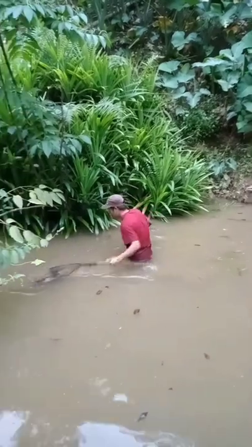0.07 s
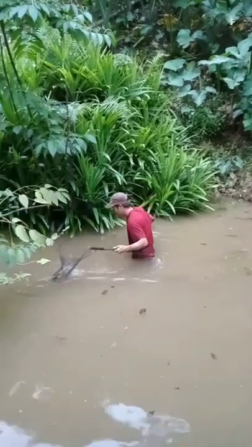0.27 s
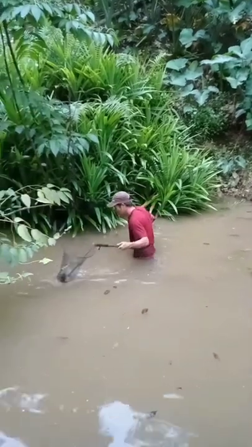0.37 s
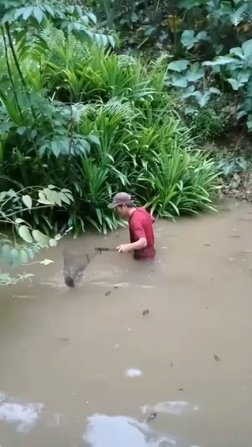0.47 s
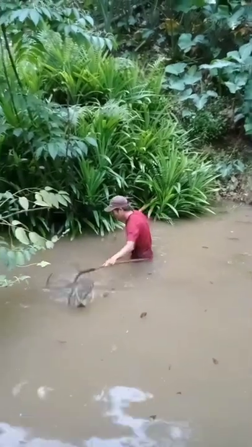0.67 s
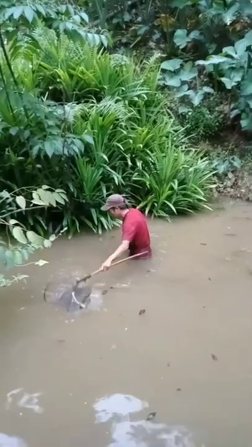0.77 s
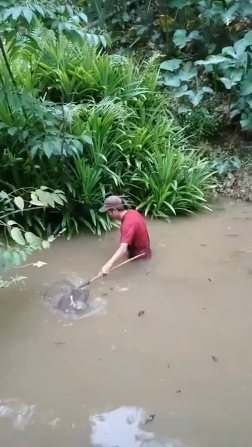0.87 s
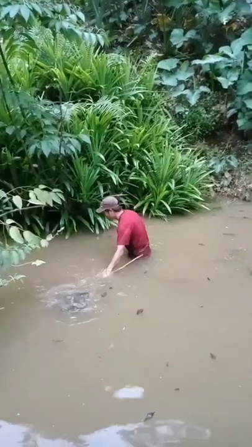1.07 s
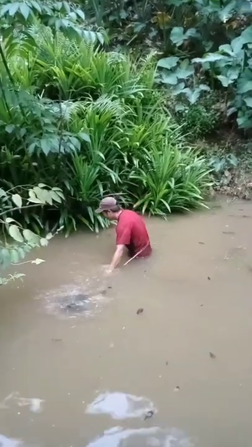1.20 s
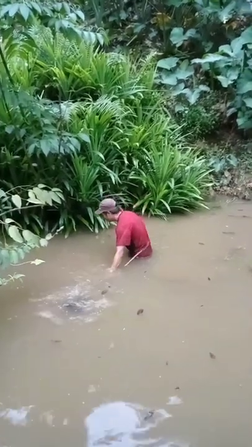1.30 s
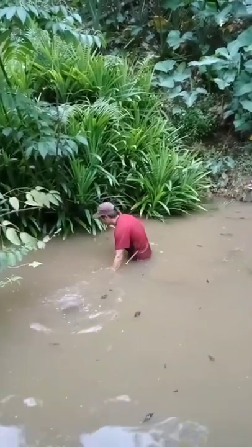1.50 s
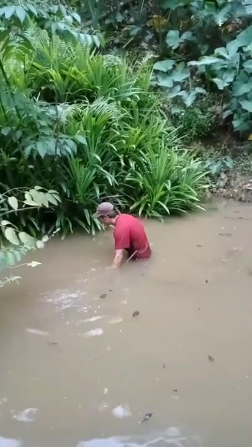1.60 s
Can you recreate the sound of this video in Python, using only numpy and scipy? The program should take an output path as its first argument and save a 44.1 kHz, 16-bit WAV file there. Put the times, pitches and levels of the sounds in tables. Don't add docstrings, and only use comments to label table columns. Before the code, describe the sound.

A hand net stirs and plunges into a pond: light gulps and drips first, then a burst of splashes around one second, fading to small blips; faint insects and hiss outdoors, water heard clear and close.

```python
import sys
import numpy as np
from scipy import signal
from scipy.fft import rfft, irfft, next_fast_len
from scipy.io import wavfile
from scipy.ndimage import map_coordinates

SR = 44100
rng = np.random.default_rng(int(sys.argv[2]) if len(sys.argv) > 2 else 0)


def dump(signal):
    limited = np.clip(np.atleast_2d(signal).T, -1, 1)
    pcm = np.round(limited * 32767).astype(np.int16)
    wavfile.write(sys.argv[1], SR, pcm)


def invert_db(x):
    u = np.asarray(x, float) / 20
    return 10 ** u


N = 72765

# frequency in Hz, density in dB per Hz.
RUMBLE_COLOUR = [(20, -51), (60, -4), (150, 1.5), (300, -5.5), (750, -6), (1050, -7), (2400, -15),
                 (3000, -16)]
# frequency in Hz, density in dB per Hz.
HISS_COLOUR = [(2000, -46), (2700, -1.5), (5300, -4.5), (6100, -10), (8000, -22), (9500, -4.5),
               (12700, -12.5), (15500, -3.5)]
# centre in Hz, width in Hz, level in dB, pulses per second, pulse depth 0-1.
INSECTS = [
    (7067, 180, -71, 69, 0),
    (5164, 380, -63.5, 54, 0.18),
    (4534, 340, -65.5, 19, 0.26),
    (3150, 270, -73.5, 29, 1),
    (9170, 330, -70.5, 110, 0.3),
]
# time in seconds, gain in dB.
CHOIR_SWELL = [
    (0, -1.5),
    (.3, -1),
    (.7, 0),
    (1.1, 3),
    (1.3, 3),
    (1.41, 1),
    (1.45, -7.5),
    (1.55, 0),
    (1.65, -4),
]
# start in seconds, length in seconds, pitch in Hz, level in dB.
FROGS = [
    (0.26, 0.18, 1010, -66),
    (0.33, 0.354, 300, -67),
    (0.26, 0.17, 139.4, -66.5),
    (0.55, 0.085, 150, -67.5),
]
# time in seconds, strength in dB.
STIRRING = [(0, -65), (.2, -63.5), (.25, -56.5), (.36, -57.5), (.59, -58.5), (0.619, -52.5), (.69, -60.5),
            (.72, -55), (.85, -55.5), (0.913, -54), (0.937, -45.5), (0.978, -46), (1.008, -55),
            (1.06, -55.5), (1.09, -52.5), (1.17, -57.5), (1.225, -54.5), (1.281, -69.5)]
# time in seconds, mist gained in dB (coarse fizz loses half).
FINENESS = [
    (0, 2.5),
    (.3, -1),
    (.6, 0),
    (.82, 0.5),
    (.87, 1),
    (.96, 3),
    (1.03, -0.5),
    (1.14, 3.5),
    (1.18, 1),
]
# frequency in Hz, density in dB per Hz.
CHURN_COLOUR = [(120, -16), (300, -9.5), (700, -0.5), (1050, -4), (1400, 4), (2200, 11.5), (2650, 9),
                (3200, -70)]
# frequency in Hz, density in dB per Hz.
FIZZ_COLOUR = [(2200, -48), (2800, -6), (3300, -2.5), (5300, -5.5), (6200, -18), (9500, -5), (12300, -16.5),
               (15500, -16.5)]
# time in seconds, peak in dB.
SPRAY = [(0.234, -45), (0.5262, -56), (0.606, -50), (0.7222, -43.5), (0.82, -44), (0.8723, -42),
         (0.888, -41), (0.9196, -48), (0.9414, -35.5), (0.978, -46), (1.0306, -44), (1.07, -44.5),
         (1.0992, -45), (1.1308, -41), (1.2045, -35.5), (1.2095, -35), (1.2162, -41), (1.223, -40),
         (1.231, -35), (1.5783, -47.5)]
# frequency in Hz, density in dB per Hz.
TICK_COLOUR = [(2500, -42), (6000, -24), (9500, 7.5), (12500, -17), (15500, -7.5)]
# start in seconds, peak in dB, pitch in Hz, life in cycles.
DROPS = [(.065, -40.5, 3110, 15), (0.114, -38, 3240, 10), (.215, -36.5, 2040, 9.7), (.261, -39, 1720, 11),
         (.47, -40, 3150, 39), (.4965, -34.5, 2100, 8.8), (.611, -42, 2110, 11), (0.652, -39, 2090, 16),
         (.709, -41, 1810, 28), (.722, -37, 2720, 44), (.737, -35, 2195, 16), (.752, -35, 2130, 16),
         (0.758, -28.5, 2410, 11), (.4705, -40, 4100, 6), (.792, -41, 2210, 18), (0.832, -39, 2330, 18),
         (.875, -36.5, 2380, 21), (.898, -36, 2440, 18), (.921, -32.5, 2100, 11), (.93, -33, 2030, 17.5),
         (0.942, -34, 3350, 39), (.948, -29.5, 2390, 23), (.957, -33, 2120, 21), (0.962, -26.5, 2860, 11),
         (.975, -31, 2330, 17.5), (0.98, -24.5, 4040, 13.3), (1.031, -39, 3420, 14),
         (1.079, -22.5, 3390, 8.8), (1.0805, -24.5, 3180, 16), (1.079, -35, 2140, 13),
         (1.084, -28, 2100, 7.8), (1.081, -33, 4250, 14), (1.07, -34, 4300, 14), (1.087, -44, 3380, 9),
         (1.093, -41, 2300, 14), (1.097, -41, 2170, 10), (.525, -36, 2100, 10), (0.56, -37, 1790, 8.5),
         (0.578, -40, 2130, 16), (.944, -38, 10100, 25), (.953, -37, 8900, 24), (.963, -31, 9700, 22),
         (.968, -34, 8360, 22), (.9745, -30.5, 9600, 25), (1.097, -36.5, 3150, 20),
         (1.197, -43.5, 1810, 19), (1.439, -48.5, 2980, 22), (1.554, -51, 3040, 20), (1.352, -55, 3430, 20)]
# start in seconds, peak in dB, pitch in Hz,
# life in seconds, ratio of end pitch to start pitch.
AIR_POCKETS = [(0.24, -38.5, 264, 0.055, 3.2), (.235, -45.5, 636, 0.012, 1),
               (.543, -37, 734, 0.018, 0.84), (.617, -34.5, 716, 0.0069, 1.15),
               (.626, -40.5, 731, 0.013, 1.1), (.666, -41, 580, 0.024, 0.97),
               (.702, -45, 589, 0.032, 1.7), (.746, -50, 647, 0.028, 1.05), (.764, -52, 277, 0.019, 0.88),
               (.877, -49.5, 727, 0.028, 1.3), (.922, -35.5, 729, 0.019, 0.92),
               (.936, -40.5, 433, 0.027, 0.82), (.969, -31.5, 640, 0.014, 0.85),
               (.992, -37.5, 603, 0.014, 1.05), (1.009, -43.5, 641, 0.024, 2.1),
               (1.1, -41, 402.3, 0.056, 1.02), (1.099, -43, 713, 0.021, 0.97),
               (1.138, -38.5, 570, 0.0076, 1.5), (1.233, -41.5, 355, 0.044, 2.15),
               (1.253, -37, 585, 0.018, 1.08), (1.265, -37, 691, 0.017, 1.12),
               (1.253, -38.5, 1437, 0.021, 1.25), (.497, -32, 1370, 0.013, 0.94),
               (.643, -40, 1470, 0.0091, 0.86),
               (.005, -59.5, 417, .03, 0.97), (.075, -57, 432, 0.026, .9), (.11, -67, 614, 0.047, 1.8),
                 (.268, -52, 290, 0.041, 1.2), (.368, -60, 527, .025, 0.85), (.435, -77, 520, 0.023, 0.81),
                 (.513, -44, 1360, 0.012, 1.1), (.543, -45.5, 1297, 0.024, 1.16),
                 (.572, -54, 766, 0.024, 1.06), (.606, -55, 515, 0.014, 1.1),
                 (.633, -48.5, 870, 0.013, 0.91), (.643, -44.5, 625, 0.014, 0.79),
                 (.654, -38, 716, 0.0088, 1.5), (.684, -42, 627, 0.014, 1.4),
                 (.703, -46.5, 823, .022, 1.15), (.705, -46, 412, .012, 0.63), (.76, -51, 710, .014, 1.25),
                 (.862, -42, 774, 0.0067, 0.85), (.888, -54, 790, .012, 1), (.917, -46, 330, 0.0092, 0.9),
                 (.946, -39, 430, 0.019, 0.85), (.955, -47.5, 625, 0.0052, 1.5),
                 (1.0, -52.5, 325, 0.044, 0.86), (1.001, -37, 605, 0.013, 1.15),
                 (1.083, -42.5, 1010, .008, 0.79), (1.115, -63, 594, 0.011, 1.1),
                 (1.15, -49.5, 480, 0.024, 1.03), (1.185, -54, 279, 0.034, 1),
                 (1.215, -42.5, 437, .015, 0.77), (1.295, -58, 747, 0.029, 1.16),
                 (1.34, -56, 560, 0.033, 0.89), (1.4, -62, 611, 0.038, 1.7),
                 (1.437, -58.5, 896, 0.016, 1.1), (1.46, -50, 895, 0.0047, 1.1),
                 (1.49, -63.5, 752, 0.043, 1.2), (1.517, -61, 1476, 0.014, 1),
                 (1.568, -56.5, 1280, 0.021, 1), (1.597, -55.5, 1510, 0.0091, 1)]


def unit(x):
    return x / np.sqrt(np.mean(x ** 2) + 1e-20)


def noise():
    return rng.standard_normal(N)


def wobble(rate):
    knots = rng.standard_normal(int(N * rate / SR) + 4)
    return map_coordinates(knots, [np.arange(N) * rate / SR])


def curve(points):
    return np.interp(np.arange(N) / SR, *np.transpose(points))


def filtered(x, response):
    size = next_fast_len(N + SR // 2)
    hz = np.fft.rfftfreq(size, 1 / SR)
    return irfft(rfft(x, size) * response(hz), size)[:N]


def coloured(x, colour):
    f, db = np.transpose(colour)
    return unit(filtered(x, lambda hz: invert_db(np.interp(np.log(hz + 1), np.log(f + 1), db))))


def bubbles(start, db, hz, life, rise, attack_s, fade_db, size):
    t = np.arange(size) / SR
    age = t / life[:, None]
    glide = 1 + (rise[:, None] - 1) * np.minimum(age, 1.3) ** 2 / 3
    ring = np.sin(2 * np.pi * hz[:, None] * t * glide)
    envelope = invert_db(db[:, None] - fade_db * age) * (1 - np.exp(-t / attack_s))
    envelope = envelope * np.clip(3 - 2 * age, 0, 1)
    at = np.round(start * SR).astype(int)[:, None] + np.arange(size)
    return np.bincount(at.ravel(), (envelope * ring).ravel(), N + size)[:N]


def swarm(lo_hz, hi_hz, cycles, spread_db, count, size):
    u = rng.random((count, 4))
    start = u[:, 0] * (N - 1) / SR
    db = spread_db * u[:, 2] ** 2
    hz = lo_hz * (hi_hz / lo_hz) ** u[:, 1]
    life = cycles * (0.5 + u[:, 3]) / hz
    return unit(bubbles(start, db, hz, life, np.full(count, 1.152), 0.000072, 16, size))


def far():
    rumble = invert_db(-68.5 + 0.73 * wobble(8.06)) * coloured(noise(), RUMBLE_COLOUR)
    hiss = invert_db(-66) * coloured(noise(), HISS_COLOUR)
    return rumble + hiss


def insects():
    out = np.zeros(N)
    choir_db = curve(CHOIR_SWELL)
    for hz, width, db, rate, depth in INSECTS:
        rasp = unit(filtered(noise(), lambda f: np.exp(-((f - hz) / width) ** 4)))
        beat = np.cos(2 * np.pi * np.cumsum(rate * (1 + 0.054 * wobble(8.6))) / SR)
        in_choir = 4000 < hz < 6000
        swell_db = 0.2 * wobble(6.03) + choir_db * in_choir
        out += invert_db(db + swell_db) * (1 + np.clip(depth, 0, 1) * beat) * rasp
    return out


def frogs():
    out = np.zeros(N)
    t = np.arange(N) / SR
    for start, length, hz, db in FROGS:
        swell = np.sqrt(np.abs(np.sin(np.pi * np.clip((t - start) / length, 0, 1))))
        tone = np.sin(2 * np.pi * hz * np.cumsum(1 + 0.0118 * wobble(15)) / SR)
        out += invert_db(db + 2.0 * wobble(40.3)) * swell * tone
    return out


def bank_echo(x):
    delay_s, t60_s = 0.012, 0.1
    t = np.arange(SR // 4) / SR
    tail = rng.standard_normal(len(t)) * invert_db(-60 * t / t60_s) * (t > delay_s)
    return signal.fftconvolve(x, tail / np.linalg.norm(tail))[:N]


def churn():
    stir_db = curve(STIRRING)
    stir_db = stir_db - stir_db.mean() + 1.3 * wobble(40)

    bed = coloured(noise(), [(200, 0), (3000, -12)])
    crowd = swarm(251.0, 3033, cycles=9.3, spread_db=8, count=1800, size=1600)
    body = coloured(crowd + 0.89 * bed, CHURN_COLOUR)

    crowd = swarm(2390, 14540, cycles=7.6, spread_db=15.5, count=8000, size=200)
    fizz = coloured(crowd + 0.95 * noise(), FIZZ_COLOUR)
    mist = filtered(fizz, lambda hz: hz > 7620)
    coarse = fizz - mist
    fine_db = curve(FINENESS)
    clumps = invert_db(2.5 * wobble(130))
    fizz = clumps * (invert_db(fine_db) * mist + invert_db(-fine_db / 2) * coarse)

    return invert_db(-61.5 + 1.133 * stir_db) * body + invert_db(-60.5 + stir_db) * fizz


def spray():
    size, decay_s, trim_db = 400, 0.0018, -6
    gate = np.zeros(N + size)
    t = np.arange(size) / SR
    for start, db in SPRAY:
        gate[round(start * SR):][:size] += invert_db(db + trim_db) * np.exp(-t / decay_s)
    return gate[:N] * coloured(noise(), TICK_COLOUR)


def drops():
    start, db, hz, cycles = np.transpose(DROPS)
    rise = np.full(len(hz), 1.036)
    return bubbles(start, db, hz, cycles / hz, rise, attack_s=0.0008, fade_db=27.5, size=1200)


def gulps():
    start, db, hz, life, rise = np.transpose(AIR_POCKETS)
    attack_s = 1.08 / hz[:, None]
    pockets = bubbles(start, db, hz, life, rise, attack_s, fade_db=21, size=4500)
    return invert_db(1.5 * wobble(150)) * pockets


def scene():
    background = far() + insects() + frogs()
    near = spray() + drops() + gulps()
    return (background + churn() + invert_db(-15) * bank_echo(near) + near)[None]


def top_cut(x):
    return signal.sosfilt(signal.butter(12, 15680, fs=SR, output="sos"), x)


def record(dry):
    mix = filtered(dry[0], lambda hz: (hz < 15600) / (1 + (45 / (hz + 1)) ** 2))
    return top_cut(mix[None])


dry = scene()
out = record(dry)
dump(out)
```